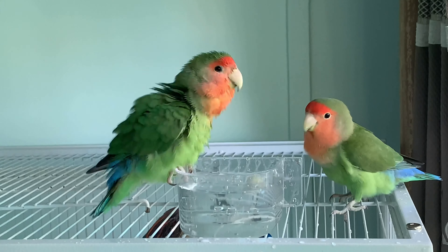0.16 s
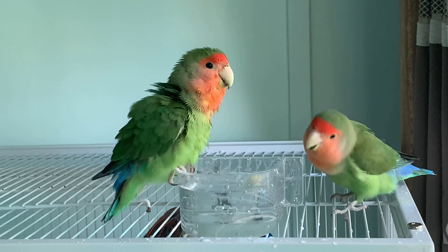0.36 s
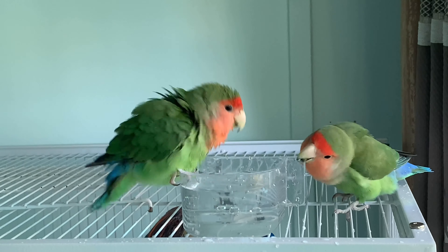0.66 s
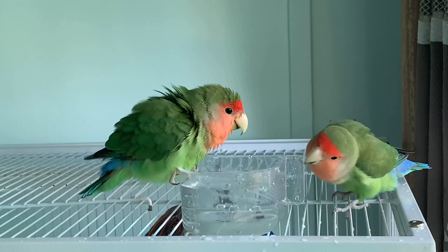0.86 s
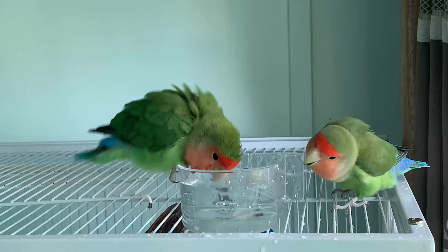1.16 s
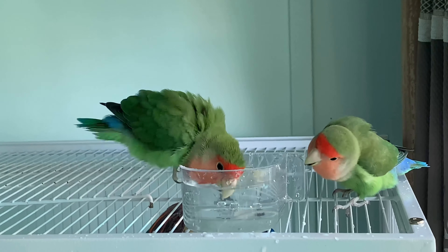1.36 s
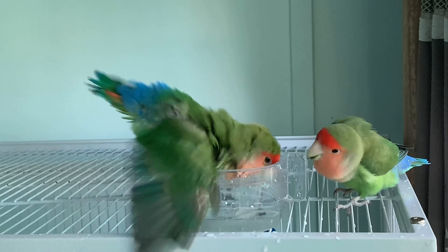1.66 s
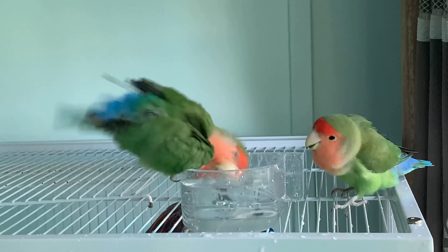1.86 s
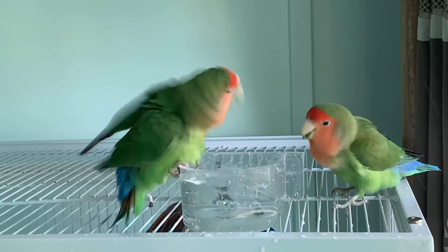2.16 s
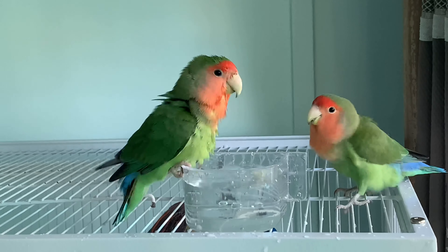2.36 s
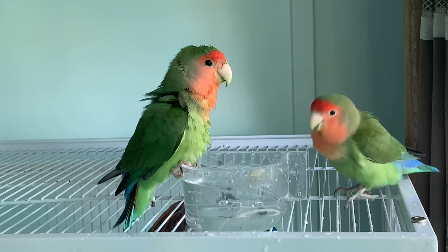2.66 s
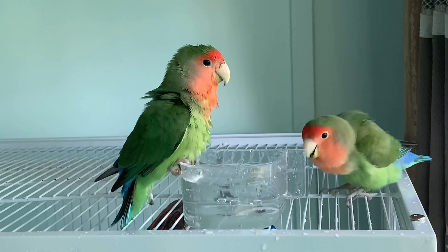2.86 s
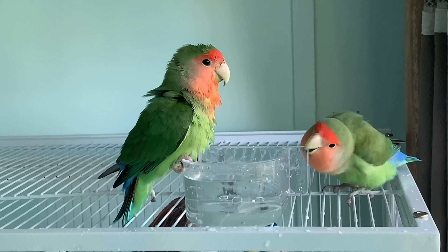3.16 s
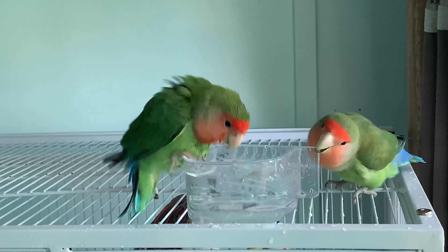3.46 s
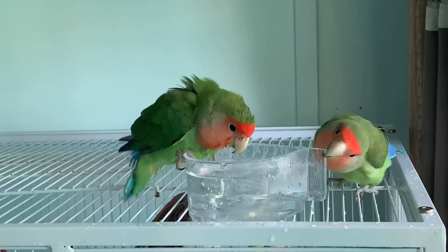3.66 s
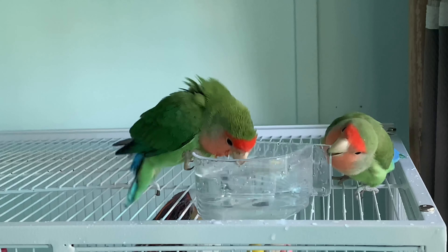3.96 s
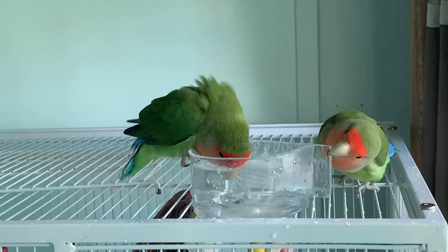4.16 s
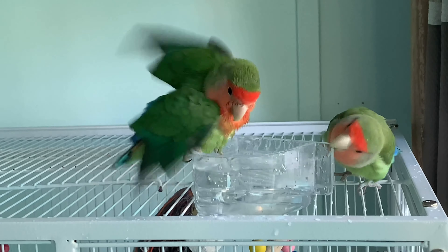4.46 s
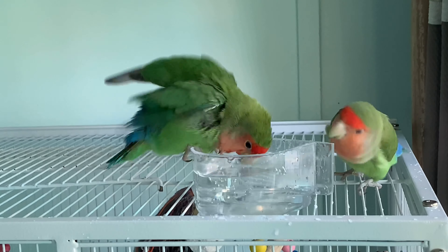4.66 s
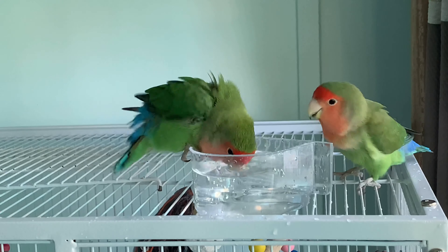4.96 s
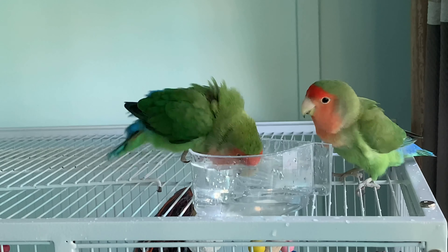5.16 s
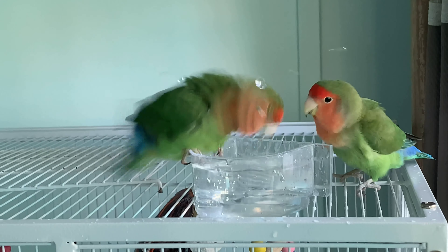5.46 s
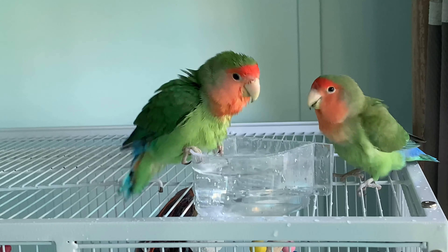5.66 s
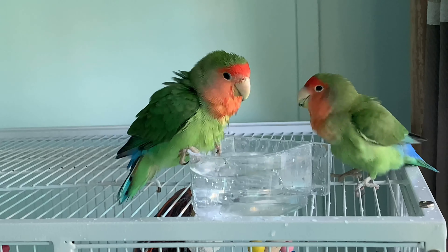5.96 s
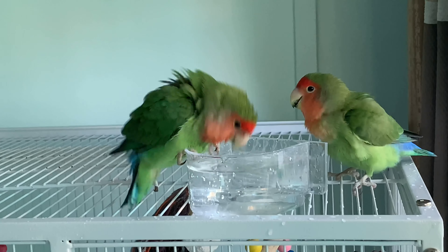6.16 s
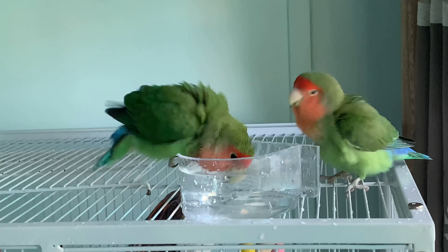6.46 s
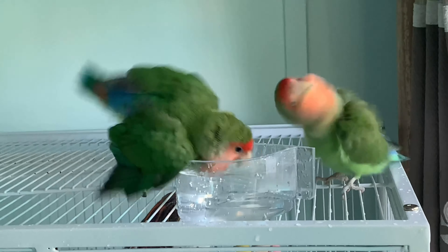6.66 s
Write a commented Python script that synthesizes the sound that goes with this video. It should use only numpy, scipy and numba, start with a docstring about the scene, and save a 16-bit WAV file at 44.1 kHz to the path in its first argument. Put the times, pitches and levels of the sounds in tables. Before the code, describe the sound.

A close phone microphone hears the tail of an earlier bird call die away, then faint feather rustle and a quiet raspy chirp. Crisp ticks from flung water and claws on wire cluster around two seconds and again at three and a half. Four stronger shrill parrot calls follow from about four seconds, the one near six being loudest and cleanest. The hard room rings after each, over low wavering hum.

```python
"""Small parrots call, clean or squawking, in a bare, ringing room while one bathes in a dish on a wire cage.
Close to the phone, after the ringing of an earlier call, wet feathers rustle and claws and flung drops tick;
the house rumbles and hums beneath. Calls are stacks of overtones with a rasp of air, ticks are snaps with a
noisy spray, the first ringing and the feathers are shaped hiss, the house is shaped noise and a wavering
tone. Two phone microphones hear it all, and the phone turns itself down soon after loud sound."""
import sys
import numpy as np
from scipy import signal
from scipy.fft import rfft, irfft
from scipy.io import wavfile
from scipy.ndimage import uniform_filter1d
from numba import njit

SR = 44100
rng = np.random.default_rng(int(sys.argv[2]) if len(sys.argv) > 2 else 0)


def int16_out(signal):
    """Quantize to a 16-bit WAV file."""
    q = np.round(np.clip(np.atleast_2d(signal).T, -1, 1) * 32767)
    wavfile.write(sys.argv[1], SR, q.astype(np.int16))


N = 300321
HZ = np.fft.rfftfreq(N, 1 / SR)
TIME = np.arange(N) / SR
TOP_HZ = 14550  # highest overtone sung, and the top of the phone's range


def undb(db):
    """Decibels to an amplitude factor."""
    return 10 ** (np.asarray(db) / 20)


def unit(x):
    """Scale to an RMS of 1."""
    return x / np.sqrt(np.mean(x ** 2))


def at(table, hz, count=1):
    """Read a column of (hz, value, ..) rows on a log-frequency axis."""
    rows = np.transpose(table)
    return np.interp(np.log(np.maximum(hz, 1)), np.log(rows[0]), rows[count])


def shaped(x, gain):
    """Filter by a gain for each frequency in HZ."""
    return irfft(rfft(x) * gain, N)


def left_right(db):
    """Split a left minus right difference in dB evenly over the two ports."""
    return np.array([[db / 2], [-db / 2]])


def walk(rate, size=N):
    """Random wander of RMS 1: levels held for 1 / rate s, then smoothed twice."""
    hold = max(int(SR / rate), 1)
    steps = np.repeat(rng.standard_normal(size // hold + 1), hold)
    smooth = uniform_filter1d(uniform_filter1d(steps, hold), hold)
    return unit(smooth[:size])


# Bouts of soft hiss: the first, at 0 s, stands in for the ringing of an earlier call,
# the rest are wet feathers rubbing: (loudest_s, level_db, fade_db_per_s)
HISS_BOUTS = [(0, -55, 130), (.78, -66, 25), (1.6, -67, 27), (2.0, -64.5, 70.5), (2.45, -76.5, 3.5),
              (3.65, -64.5, 95), (4.3, -69.5, 51.5)]
# Colour of the hiss: (hz, level_db relative)
HISS_COLOUR = [(1500, -19.5), (3000, -1), (5000, -7), (8500, -7), (10500, -14), (13000, -11.5),
               (14500, -24.5)]
HISS_RISE_DB_PER_S, HISS_BED_DB = 92.5, -80


def ringing_and_rustle():
    """Flickering hiss, unrelated at the two ports: an earlier call's ringing, then bouts of wet feathers."""
    colour = undb(at(HISS_COLOUR, HZ))
    hiss = np.array([unit(shaped(rng.standard_normal(N), colour)) for _ in range(2)])
    level = undb(HISS_BED_DB)
    for loudest_s, level_db, fade in HISS_BOUTS:
        since = TIME - loudest_s
        level = level + undb(level_db + np.minimum(HISS_RISE_DB_PER_S * since, -fade * since))
    flicker_db = 1.5 * walk(40)
    return hiss * level * undb(flicker_db)


# Colour of the house rumble: (hz, level_db relative)
HOUSE_COLOUR = [(12, -92), (20, -2.5), (29, -26), (43, -10), (64, -3), (107, -11), (150, -4.5), (208, -12),
                (414, -22), (463, -18), (517, -22), (1640, -32), (3270, -49), (4080, -49.5), (14500, -68.5)]
# How the rumble compares at the two ports: (hz, likeness 0-1, left_lead_rad)
PORT_LIKENESS = [(60, 0.78, 0), (130, 0.97, -0.77), (295, 1, -1.07), (680, 1, -2), (1386, 0.13, -1.2),
                 (2960, 0.041, -5.5), (14400, .1, -6)]
# Level of the wavering hum: (time_s, level_db)
HUM_LEVEL = [(0.0, -42), (1.1, -49.5), (1.25, -38), (1.57, -42), (1.68, -35.5), (2.01, -43), (2.14, -35.5),
             (2.9, -39.5), (3.11, -36.5), (3.62, -42), (3.71, -60), (3.92, -39), (4.45, -45.5), (4.58, -37),
             (4.72, -64), (5.03, -43), (5.61, -56), (5.86, -40), (5.96, -65), (6.28, -32), (6.81, -38)]
HOUSE_DB = -39
HUM_HZ, HUM_WIDTH_HZ = 52.3, 2.5  # centre and RMS wander of the pitch


def house():
    """Rumble falling toward the treble, alike at both ports in the bass, and a narrow wavering hum."""
    alike = np.clip(at(PORT_LIKENESS, HZ), 0, 1)
    lead = np.exp(1j * at(PORT_LIKENESS, HZ, count=2))
    right, other = (rfft(rng.standard_normal(N)) * undb(at(HOUSE_COLOUR, HZ)) for _ in range(2))
    left = right * alike * lead + other * np.sqrt(1 - alike ** 2)
    rumble = irfft(np.array([left, right]), N)
    hum_hz = HUM_HZ + HUM_WIDTH_HZ * walk(25)
    hum = np.sqrt(2) * np.sin(2 * np.pi * np.cumsum(hum_hz) / SR)
    hum_db = np.interp(TIME, *np.transpose(HUM_LEVEL)) + 0.5 * walk(24)
    hum = hum * undb(hum_db + left_right(1.2))
    return unit(rumble) * undb(HOUSE_DB + .5 * walk(2.305)) + hum


# Claws on wire and flung drops:
# (start_s, level_db, low_db share of the lower band, pan_db left minus right, room_db sent to the room)
CLAWS_AND_DROPS = [(0.349, -47.5, -8, -2, 1), (0.4349, -51.5, -6, -5, 7), (0.536, -41, 2, 1, -6),
                   (0.8398, -45, 9, 3, -6), (1.4184, -48, -3.5, 1.5, 8), (1.6538, -24, -5.5, -5, -2.5),
                   (1.8255, -35, -16, 0, -8), (1.8994, -47, -5, -1.0, 5), (1.9562, -23.5, -43, 3, -10),
                   (2.0196, -16.5, -9, 4, -4.5), (2.5427, -27.5, -14, -5, -3.5), (2.87, -49.5, -9, 0, 7),
                   (3.468, -45, -7, -1, -4.5), (3.483, -37, -14, 1, -2.5), (3.515, -26.5, -2.5, -1, 2.5),
                   (3.8694, -45.5, 8.5, 4, 2), (4.3283, -35.5, -7.5, 1, 0), (4.4831, -54, 5.5, 2, 6),
                   (4.5294, -33.5, -38.5, -1.5, -4.5), (5.8825, -24, -7.5, -2, -3)]
SPRAY_DB = -7


def ticks(echo_s=.0023, echo_db=-4, spray_s=0.004):
    """Each tick is a snap, a bounce off the wire roof and a fading spray; -> both ports, what the room hears."""
    t = np.arange(2000) / SR
    snap = np.zeros(len(t))
    snap[0] = 1
    snap[int(echo_s * SR)] = -undb(echo_db)  # the bounce comes back inverted
    low = signal.butter(1, [900, 6000], "band", fs=SR)
    high = signal.butter(2, 7500, "high", fs=SR)
    out = np.zeros((3, N))
    for start_s, level_db, low_db, pan_db, room_db in CLAWS_AND_DROPS:
        spray = undb(SPRAY_DB) * rng.standard_normal(len(t)) * np.exp(-t / spray_s)
        blow = 3 * snap + spray
        burst = signal.lfilter(*high, blow) + 2 * undb(low_db) * signal.lfilter(*low, blow)
        sends_db = np.array([[pan_db / 2], [-pan_db / 2], [room_db]])
        start = int(start_s * SR)
        out[:, start:start + len(t)] += burst * undb(level_db + sends_db)
    return out[:2], out[2]


SLUR_S = .002  # how fast level and colour change from note to note


def phrase(notes, end_s):
    """Controls of an unbroken call: pitch breaks between notes and eases within them; the rest is slurred."""
    start_s, first_hz, last_hz, first_db, last_db, *held = np.transpose(notes)
    span = slice(int(start_s[0] * SR), int(end_s * SR))
    place = np.interp(TIME[span], np.append(start_s, end_s), np.arange(len(start_s) + 1))
    note = np.minimum(place.astype(int), len(start_s) - 1)
    ease = np.sin(np.pi / 2 * (place - note)) ** 2
    pitch_hz = first_hz[note] + (last_hz - first_hz)[note] * ease
    level_db = first_db[note] + (last_db - first_db)[note] * ease
    others = np.array([level_db] + [column[note] for column in held])
    return span, [pitch_hz, *uniform_filter1d(others, int(SLUR_S * SR), mode="nearest")]


# Resonance of the throat over the overtones: (hz, level_db relative)
THROAT_COLOUR = [(1500, -16), (2200, -22.5), (3000, 7), (4200, -6.5), (6000, -4), (8500, -15), (11000, -11),
                 (13500, -16)]
# Colour of the rasp of air: (hz, level_db relative)
RASP_COLOUR = [(1500, -26.5), (2600, -34.5), (3600, 3), (5000, 2.5), (6500, 9), (9000, 7.5), (11000, -7),
               (14000, -36)]
RELEASE_S = .005


def call(notes, end_s, attack_s, lowest_db, rasp_db, throb_db=4, flutter_hz=260, flutter_db=5, sway=0.11):
    """Overtones of the syrinx; weak odd ones double the pitch; roughness shakes them and adds a rasp of air."""
    span, (hz, level_db, odd_db, tilt_db, rough) = phrase(notes, end_s)
    size = len(hz)
    rise = (TIME[span] - notes[0][0]) / attack_s
    fall = (end_s - TIME[span]) / RELEASE_S
    breath = np.minimum(1, np.minimum(rise, fall))
    rough = np.clip(rough, 0, 1)
    # a slower membrane beats against the note and splits each overtone into strands
    flutter = np.sin(2 * np.pi * np.cumsum(flutter_hz * (1 + .2 * walk(60, size=size))) / SR)
    hz = hz * (1 + rough * (.055 * walk(700, size=size) + sway * flutter))
    phase = 2 * np.pi * np.cumsum(hz) / SR
    k = np.arange(1, 10)[:, None]  # overtone number, 1 is the lowest
    overtone_db = at(THROAT_COLOUR, k * hz) + odd_db * (k % 2) + lowest_db * (k == 1) + tilt_db * np.log2(k / 2)
    overtone = undb(overtone_db) * (k * hz < TOP_HZ)
    voice = (overtone * np.sin(k * phase)).sum(axis=0)
    voice = voice / np.sqrt((overtone ** 2).sum(axis=0) / 2)  # colour alone, level follows
    colour = undb(at(RASP_COLOUR, np.fft.rfftfreq(size, 1 / SR)))
    rasp = unit(irfft(rfft(rng.standard_normal(size)) * colour, size))
    pulse_db = throb_db * rough * walk(400, size=size) + flutter_db * np.sqrt(rough) * flutter
    out = np.zeros(N)
    out[span] = (voice + undb(rasp_db) * rough * rasp) * undb(level_db + pulse_db) * breath ** 2
    return out


# Notes of each call, one list a call: (start_s, first_pitch_hz, last_pitch_hz, first_level_db, last_level_db,
# odd_overtones_db, tilt_db_per_octave, roughness 0-1)
CALL_NOTES = [
    [(.979, 1600, 1773, -43, -32, -22, 9.5, .6), (1.007, 2033, 2058, -27.5, -38, -18, 7, 0.16),
     (1.02, 2213, 2167, -29, -32, 4, -7, 0.42), (1.033, 1815, 1860, -25, -30, 2.5, -2.5, 0.54),
     (1.043, 2332, 2363, -34, -24, 7, 3, 0.41), (1.052, 1990, 1950, -31, -33, -1, -1.5, 0.24),
     (1.085, 1930, 1885, -25, -24.5, -26, 3, 0.15)],
    [(3.91, 2094, 2136, -18, -27, 0, 0.5, 0.36), (3.923, 2073, 2172, -21.5, -18, -6, 0.5, 0.19),
     (3.95, 2920, 2870, -15.5, -47, -55, 1.5, 0.14)],
    [(4.982, 2050, 2076, -19.5, -29, -10, 1, 0.52), (4.992, 2857, 2780, -20.5, -17, 7, 3, 0.39),
     (5.016, 2480, 2470, -12.5, -9.5, -6, -1, .45), (5.04, 1785, 1777, -18, -12.5, -7, 9.5, 0.42),
     (5.066, 2480, 2440, -12, -15.5, -6, -3.5, 0.51), (5.09, 1965, 1906, -1, -13.5, -37, -3, 0.33)],
    [(5.881, 2230, 2250, -5, -5, -24, 10, 0.09), (5.888, 2254, 2029, -11, -13, -47, 0.5, 0),
     (5.955, 2050, 2125, -11.5, -4.5, -41, -4, 0), (5.988, 2192, 2416, -11, -16, -36, 6, 0)],
    [(6.252, 1917, 2128, -27, -26.5, -6, 1.5, 0.3), (6.298, 2435, 2420, -25.5, -27, -15.5, 1, 0.33),
     (6.314, 2473, 2536, -23.5, -24, -14.5, 4, 0.74), (6.331, 2136, 2154, -13, -29, -35, 0, .3),
     (6.343, 1883, 1804, -25, -14.5, -35, 3, .25), (6.365, 2040, 2178, -13, -17.5, -31, 1, 0.13)],
]
# Place and voice of each call:
# (end_s, attack_s, direct_db, room_db, pan_db left minus right, lowest_overtone_db, rasp_db)
CALL_PLACES = [(1.108, 0.0033, -11, 1, 16, 0.5, -1), (3.97, 0.0044, -10, -0.5, -0.5, 8, -6),
               (5.114, 0.0042, -11, -4, 2, -18, 1.5), (5.999, .002, -2.5, -1, -2, -5, 1),
               (6.403, 0.0049, 1, 5.5, 3, 10, 1)]
WALL_S, WALL_DB = .00427, -2.5
WALL_HZ = 5900  # the echo is dull above this pitch


def parrots():
    """Calls with an echo off the wall behind the birds, a path 1.5 m longer; -> both ports, what the room hears."""
    near, far = np.zeros((2, N)), np.zeros(N)
    echo = undb(WALL_DB) * np.exp(-2j * np.pi * HZ * WALL_S) / (1 + (HZ / WALL_HZ) ** 6)
    for notes, place in zip(CALL_NOTES, CALL_PLACES):
        end_s, attack_s, direct_db, room_db, pan_db, lowest_db, rasp_db = place
        voice = call(notes, end_s, attack_s, lowest_db, rasp_db)
        far += voice * undb(room_db)
        near += shaped(voice, 1 + echo) * undb(direct_db + left_right(pan_db))
    return near, far


# Ringing time of the bare room, to fall 60 dB: (hz, t60_s)
ROOM_RING = [(1500, 0.89), (4000, 0.71), (9000, 0.57), (14000, 0.39)]


def room(x, onset_s=0.0027, early_db=7, early_s=0.011):
    """Dense echoes that die band by band, stronger at first, unrelated at the two ports."""
    t = np.arange(SR) / SR
    f = np.fft.rfftfreq(SR, 1 / SR)
    noise, tail = rfft(rng.standard_normal((2, SR))), 0
    for hz in 707 * 2 ** np.arange(0, 5, .5):  # half-octave steps
        band = np.clip(1 - 2 * abs(np.log2(f / hz + 1e-9)), 0, 1)
        tail = tail + irfft(noise * band, SR) * undb(-60 * t / at(ROOM_RING, hz))
    early = 1 + undb(early_db) * np.exp(-t / early_s)
    tail = tail * early * np.clip(t / onset_s - .5, 0, 1)
    tail = tail / np.sqrt(np.mean(np.sum(tail ** 2, axis=1)))
    return signal.fftconvolve(x[None], tail, axes=1)[:, :N]


EDGE_HZ = 6800  # below this pitch the phone's edge leaves the left port's sound alone
LEFT_LAG = 15  # samples


def phone_edge(near):
    """Round the phone's edge the left port gets the direct treble late and inverted."""
    bass = shaped(near[0], 1 / (1 + (HZ / EDGE_HZ) ** 12))
    treble = near[0] - bass
    return np.array([bass - np.roll(treble, LEFT_LAG), near[1]])


def scene():
    """Direct birds and ticks, their room, the soft hiss and the house, summed at the left and right ports."""
    tick_near, tick_far = ticks()
    call_near, call_far = parrots()
    direct = phone_edge(tick_near + call_near)
    echoes = room(tick_far + call_far) * undb(left_right(-1.4))
    return direct + echoes + ringing_and_rustle() + house()


@njit
def follow(x, attack, release):
    """Envelope that climbs fast and sinks slowly."""
    e, out = 0., np.empty(len(x))
    for i in range(len(x)):
        e += (x[i] - e) * (attack if x[i] > e else release)
        out[i] = e
    return out


# Dips, and one rise on the right, in the microphones: (centre_hz, width_hz, left_db, right_db)
MICROPHONE_DIPS = [(7347, 360, -12, -17), (8420, 930, 0, 8), (11840, 317, -16, -27),
                   (13730, 110, -36, -30.5)]


def record(dry, top_db=-15, ratio=4, lag_s=0.018, release_s=0.19):
    """The phone: uneven ports, gain control that ducks soon after loud sound, rounded peaks, a steep top."""
    response_db = 0
    for hz, width, left_db, right_db in MICROPHONE_DIPS:
        response_db = response_db + np.array([[left_db], [right_db]]) / (1 + ((HZ - hz) / width) ** 2)
    x = shaped(dry, undb(response_db))
    # the louder port sets one gain for both
    loud = follow(np.abs(x).max(axis=0), 1 / (0.0051 * SR), 1 / (release_s * SR))
    gain = np.minimum(1, undb(top_db) / (loud + 1e-9)) ** (1 - 1 / max(ratio, 1))
    step = 1 / (lag_s * SR)
    gain = signal.lfilter([step], [1, step - 1], gain - 1) + 1  # the gain lags behind
    steep_top = signal.ellip(10, .2, 70, TOP_HZ, fs=SR, output="sos")
    return signal.sosfilt(steep_top, np.tanh(x * gain))


dry = scene()
out = record(dry)
int16_out(out)
```